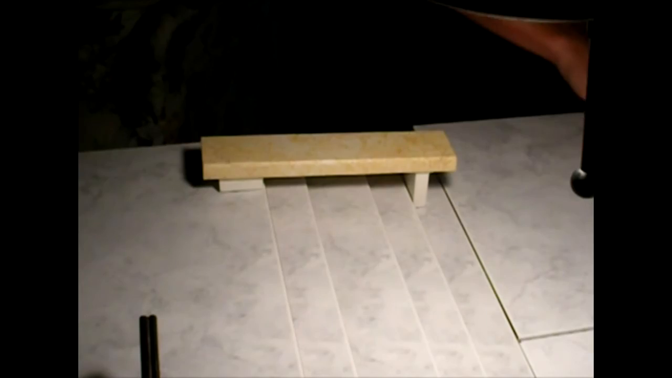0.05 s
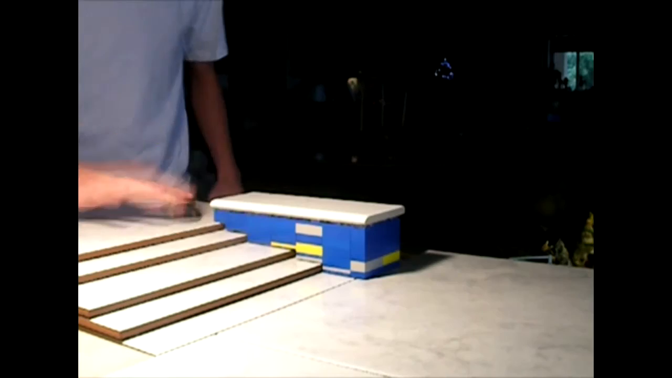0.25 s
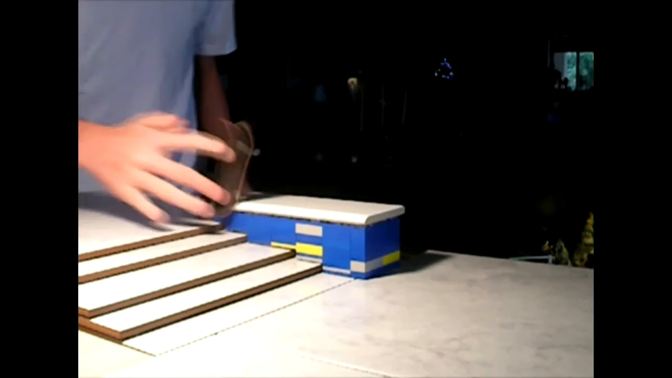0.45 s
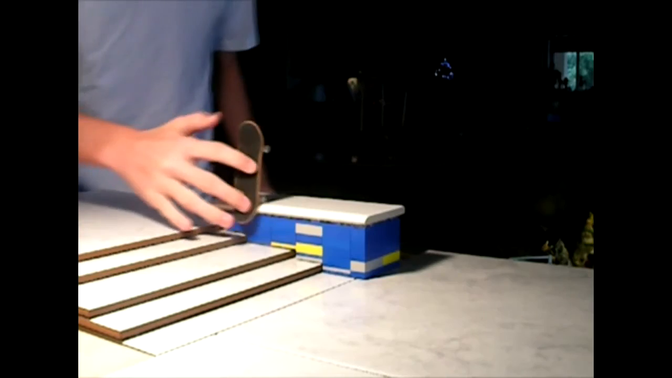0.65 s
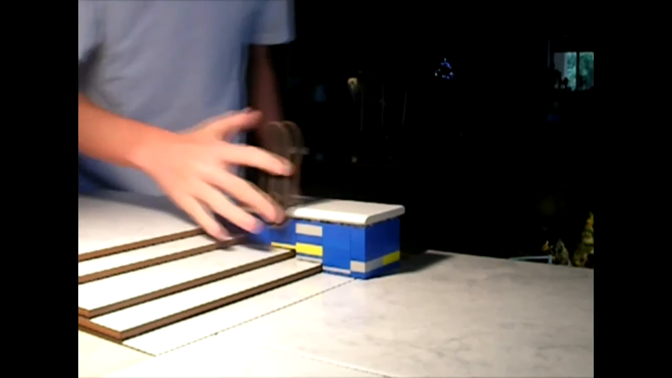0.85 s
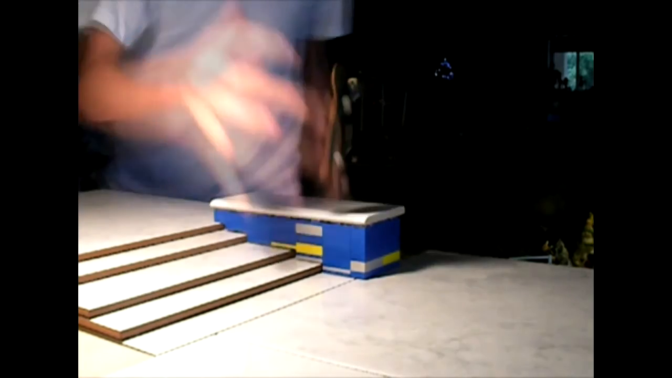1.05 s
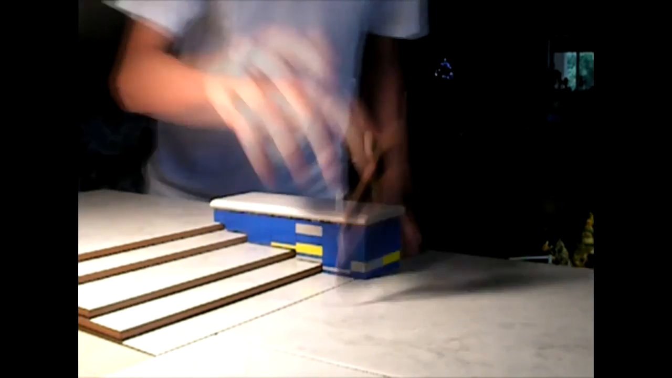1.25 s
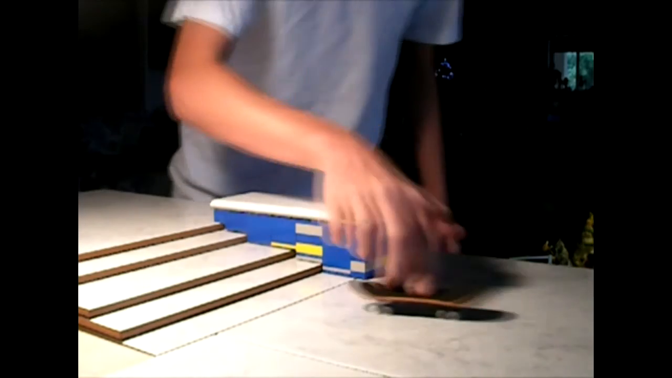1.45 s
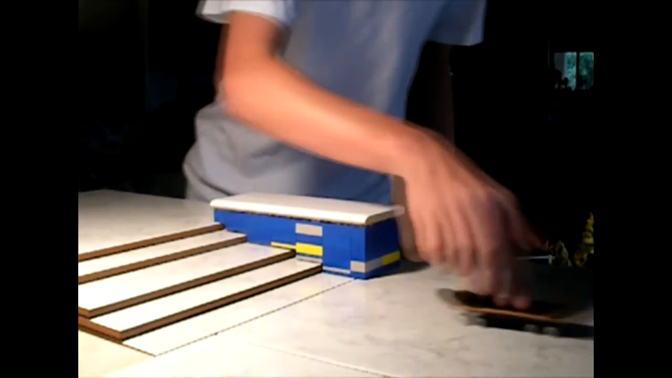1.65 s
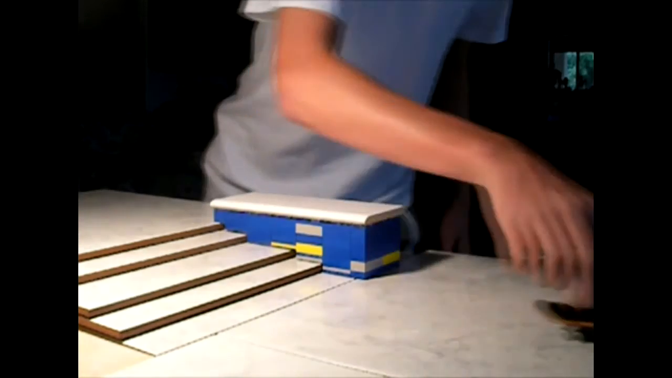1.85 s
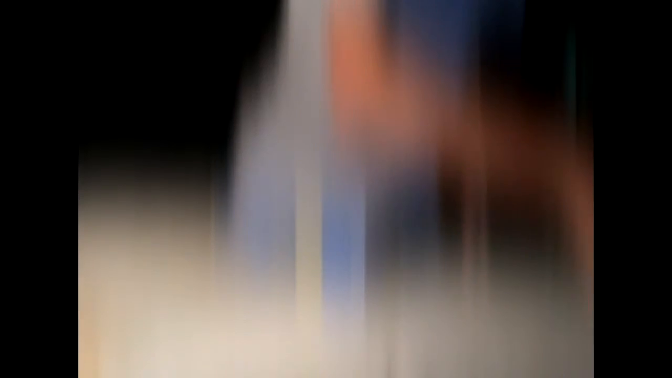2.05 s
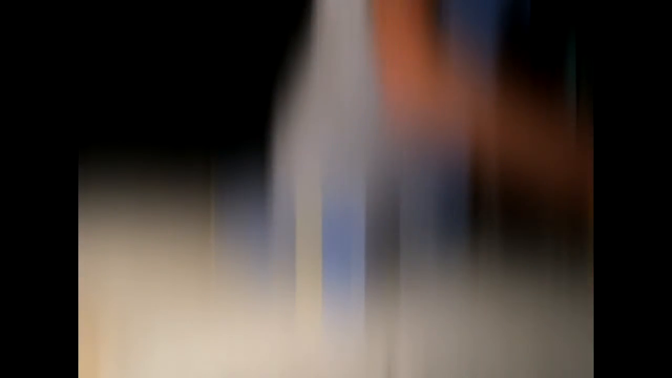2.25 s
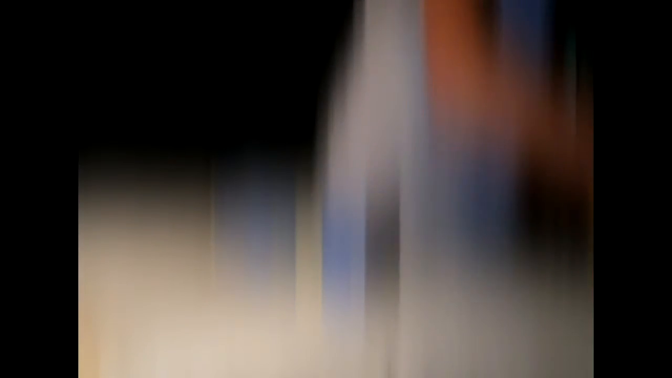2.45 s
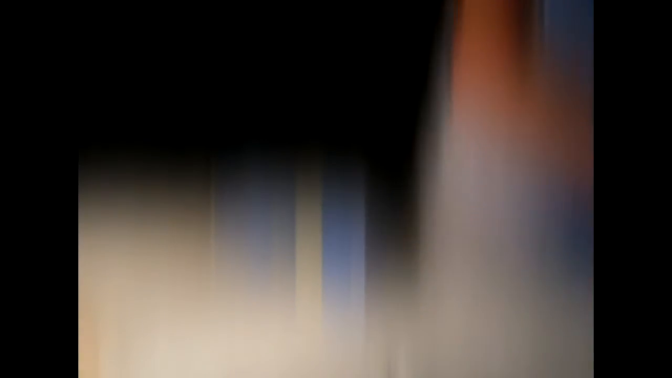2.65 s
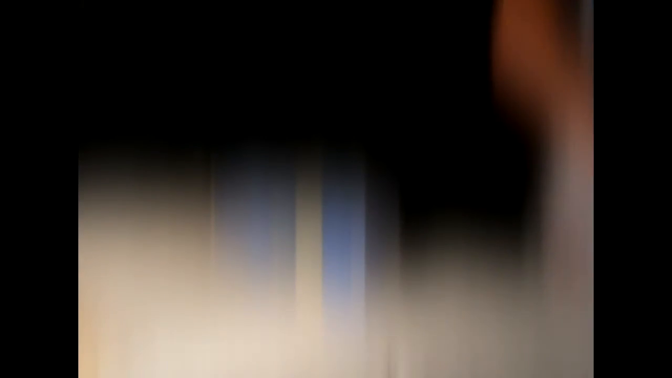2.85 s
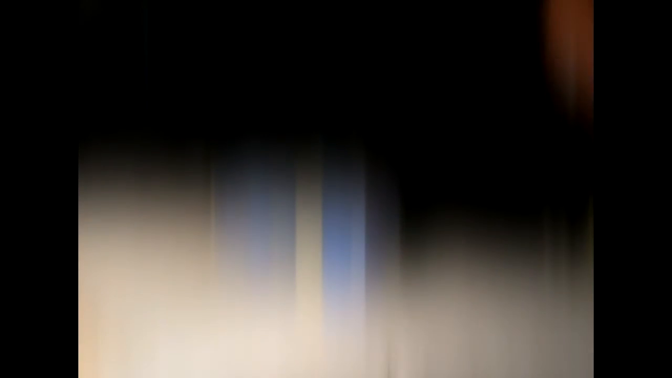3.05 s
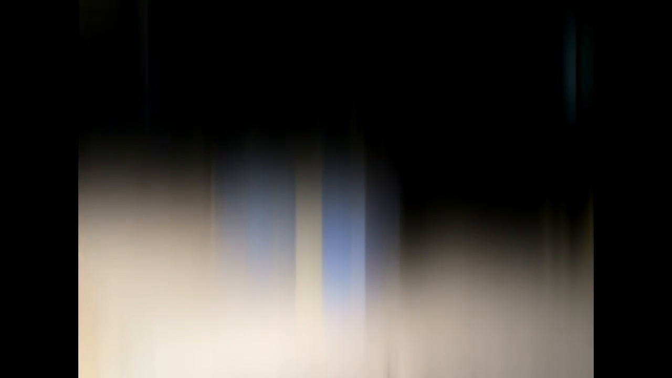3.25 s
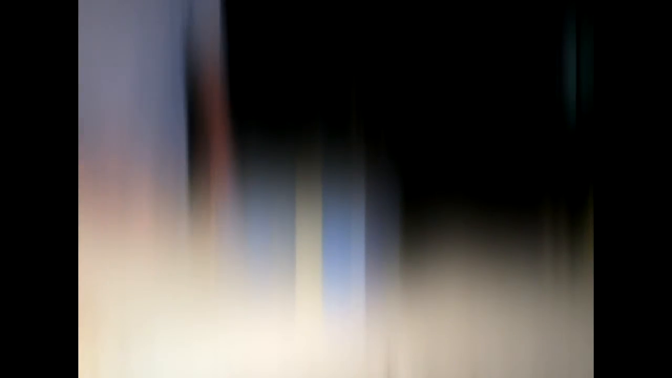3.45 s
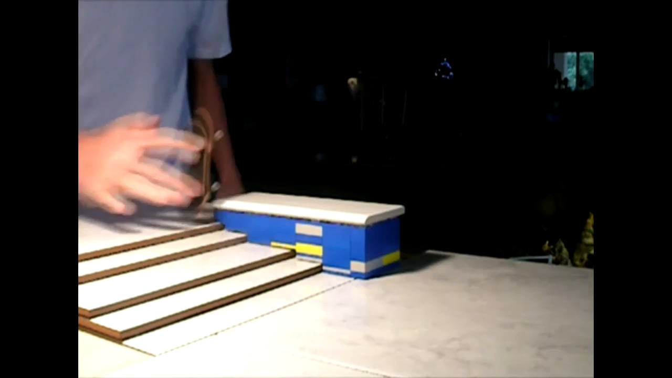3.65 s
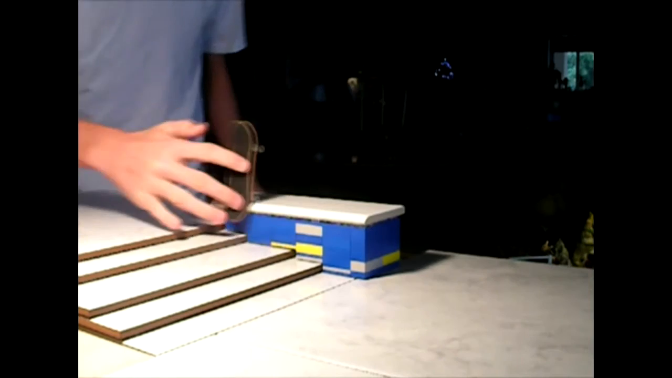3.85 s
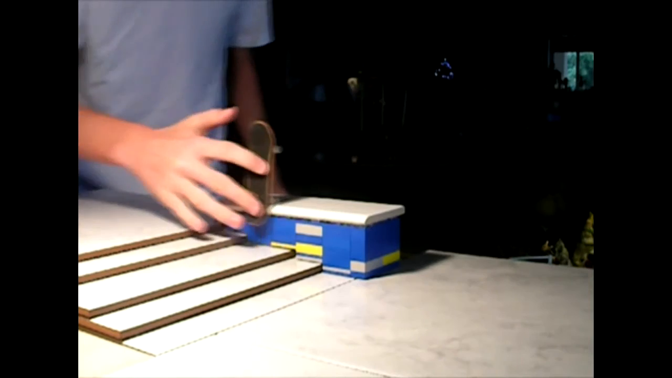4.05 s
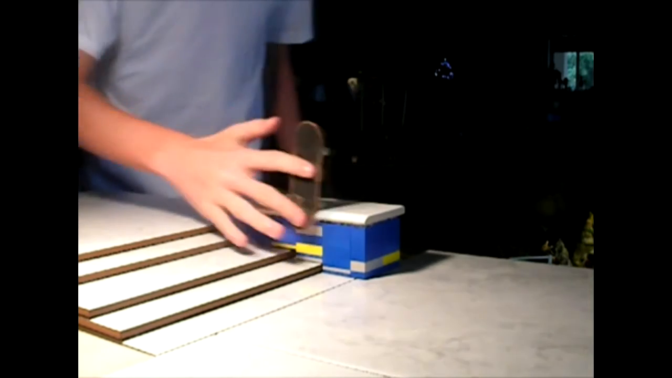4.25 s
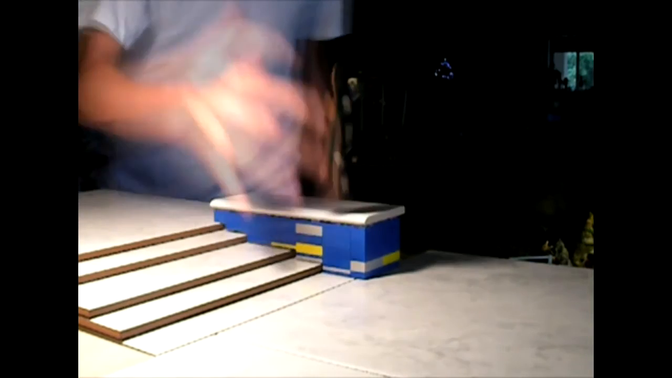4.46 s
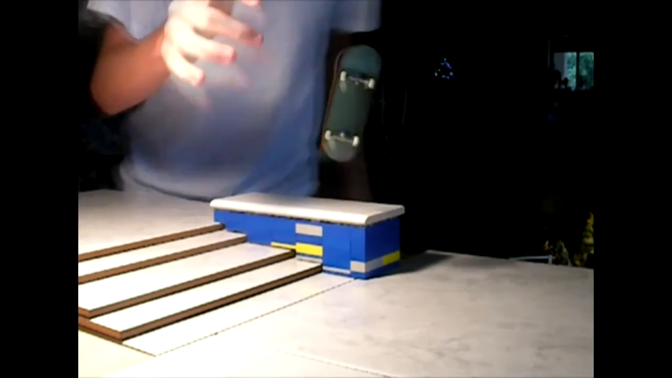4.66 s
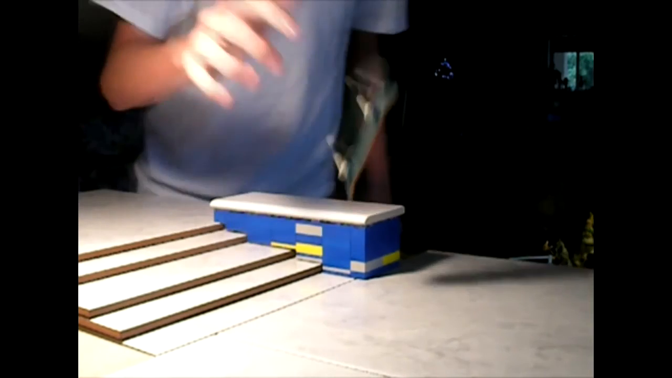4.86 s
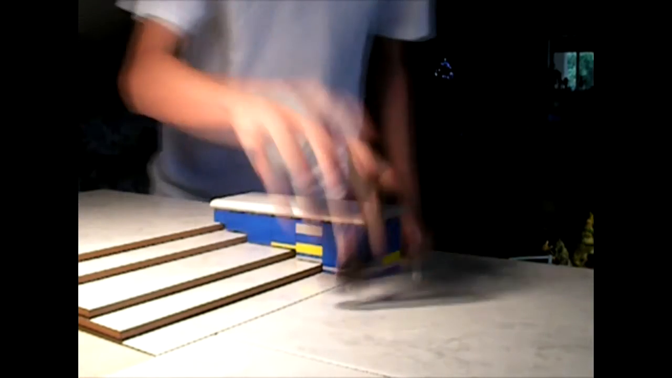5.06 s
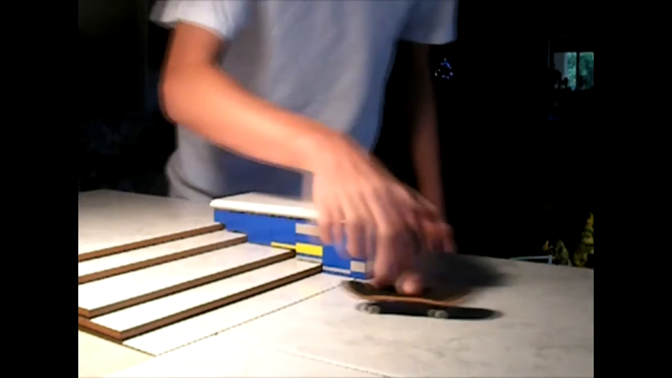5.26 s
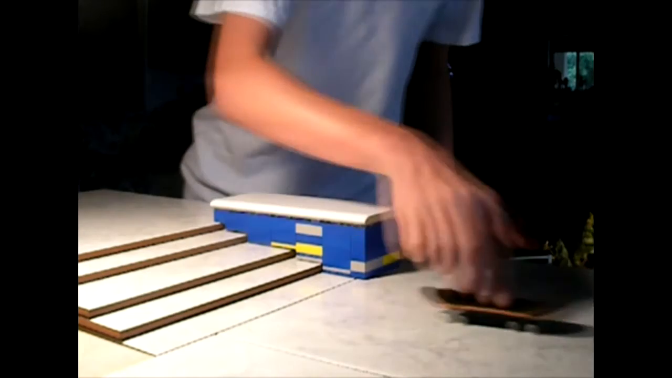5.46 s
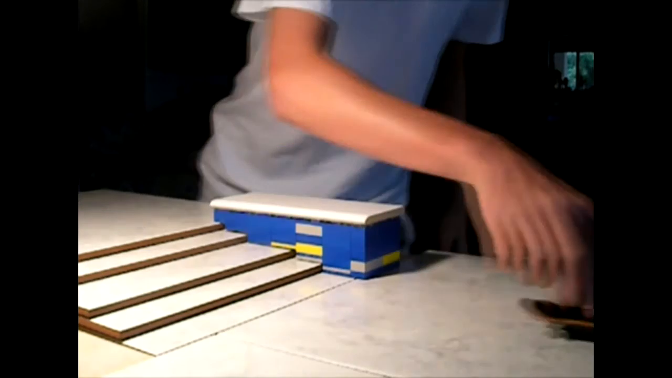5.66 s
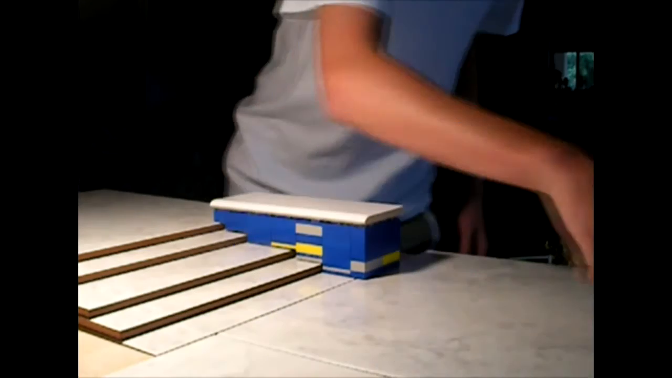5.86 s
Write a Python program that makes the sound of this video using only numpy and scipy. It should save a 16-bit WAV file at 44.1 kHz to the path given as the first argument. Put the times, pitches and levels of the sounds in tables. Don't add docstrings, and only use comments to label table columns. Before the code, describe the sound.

Lo-fi close clacks and gritty small-wheel rolling on a hard tabletop, a sharp landing, loud far knocks, then the trick again, stretched and quieter.

```python
import sys
import numpy as np
from scipy import signal
from scipy.fft import rfft, irfft
from scipy.io import wavfile
from scipy.ndimage import uniform_filter1d

SR = 44100
rng = np.random.default_rng(int(sys.argv[2]) if len(sys.argv) > 2 else 0)


def linear_from_db(decibels):
    return 10 ** (np.asarray(decibels, float) / 20)


def master(y):
    cut = np.clip(np.atleast_2d(y).T, -1, 1)
    pcm = np.round(cut * 32767)
    wavfile.write(sys.argv[1], SR, pcm.astype(np.int16))


N = 260410
T = np.arange(N) / SR

# [t/s, level/dB, skid level of the treble/dB]
RUN_UP_ROLL = [
    [(0, -41, -6), (.022, -34, -13), (.06, -36, -10), (.1, -34.5, -15)],
    [(0.118, -46, -8), (0.146, -39, -7), (0.28, -44, -4), (0.288, -40, -12), (0.324, -51, -5),
     (0.412, -37, -5), (0.43, -40, -4)],
    [(0.475, -45, 2), (0.501, -50, 3), (0.575, -50, -7)],
    [(0.72, -50, -6), (0.878, -55, -8), (0.9, -62, 2)],
    [(3.35, -50, -11), (3.356, -46, -9), (3.43, -44, -9)],
]
# [t/s, level/dB, skid level of the treble/dB]
TILE_ROLL = [
    [(1.53, -33, 2), (1.674, -40, -3), (1.728, -31, -12), (1.884, -37, -9.5), (1.91, -30.5, -20),
     (1.928, -55, -0.5), (1.94, -37, -14), (2.182, -35, -21.5), (2.2, -42.5, -22)],
    [(2.25, -44.5, 14), (2.254, -33, 6.5), (2.396, -32.5, -10), (2.425, -32.5, -27.5)],
    [(2.485, -30, -6), (2.505, -30, -14), (2.519, -30.5, -2.5), (2.579, -30, -10.5), (2.695, -46.5, -11),
     (2.8, -54.5, -10)],
    [(2.885, -53.5, -2.5), (3.025, -42.5, -18.5), (3.043, -37.5, -18), (3.08, -45, -22.5)],
]
# [f/Hz, width/Hz, level/dB]
RUN_UP_BODY = [(177.5, 14, -9.5), (340.6, 48, 8), (473, 98, 12), (810, 98, -2), (1006, 81, 0),
               (990, 210, -7), (1342, 130, 2), (1626, 49, -2.5), (2044, 390, -5.5), (2454, 560, 6.5),
               (3225, 780, 6), (3670, 170, -2)]
TILE_BODY = [(115, 64, -4.5), (150.6, 40, -9), (224.6, 56, -7.5), (300, 70, 0), (372.6, 72, -1),
             (513, 45, -1), (740.3, 98, -14.5), (863, 95, 3), (1025, 54, -4.5), (1080, 48, -9),
             (1593, 200, -1), (1856, 600, 1), (2320, 450, -2.5), (2897, 600, 2), (3620, 830, 0.5)]
# [level at cruise/dB, rise per dB below cruise/1, share of the skid level/1]
RUN_UP_LAW = [(-6, 0.34, 0.03), (-0.5, 0.26, 0.21)]
TILE_LAW = [(-0.5, .3, 0.22), (-4.5, 0.1, 0.55)]
BAND_EDGES_HZ = [650, 1300, 2200]
# [f/Hz, level/dB]
AIR_SPECTRUM = [(88, -39.5), (150, -6), (226, -1.5), (270, -6.5), (313, -1), (611, -7), (672, -2.5),
                (781, -7.5), (2030, -15.5), (3900, -27), (5070, -108), (8580, -120)]
# [t/s, peak level near 1 kHz/dB, weight of the low modes/dB, hardness of the high modes/dB]
LEDGE_KNOCKS = [(.4034, -28, -9, -3), (.4408, -25, 5, 16), (.4517, -27, 6, 6), (.466, -35, 5, 8),
                (.5901, -18, -6, 1), (.6012, -24, -3, 2), (.6072, -21, 8, -4), (.6149, -24, -2, 8),
                (.6257, -20, 2, 2), (.6357, -24, -1, 3), (.6437, -38, 13, 16), (.6773, -25, 1, -1),
                (.6829, -22, 0, -3), (.6957, -34, 8, -2), (.7093, -33, 11, -3)]
FLICK_KNOCKS = [
    (1.1067, -46, -1, 2),
    (1.159, -41, -13, -2),
    (1.1648, -45, 4, 3),
    (1.1702, -38, -4, 0),
]
LANDING_KNOCKS = [(1.4388, -11, -11, 7), (1.4410, -10, -10, 6), (1.4449, -24, 3, 4), (1.4504, -23, -6, 7),
                  (1.4727, -30, -10, 3), (1.4784, -18, 4, 9), (1.4868, -18, -4, 2), (1.4946, -18, -4, 5),
                  (1.506, -25, 2, 13), (1.5099, -18, -4, 3), (1.522, -24, -4, 7), (1.7308, -23, -15, -20)]
FAR_KNOCKS = [(2.2163, -13, -3, 4), (2.2248, -14, -3, 2), (2.2369, -19, -5, -2), (2.4359, -28, -15, 5),
              (2.4392, -9, -8, -4), (2.4504, -3.5, -7, -3), (2.4625, -16, -3, -4), (2.8531, -16, -4, -7),
              (3.0424, -26, -14, -22), (3.0624, -32, 1, -15), (3.0953, -24, -2, 0)]
# [f/Hz, level/dB, decay time t60/s]
LEDGE_MODES = [(143.5, -8, .1), (321.3, 0.5, 0.072), (397, -0.5, .08), (479.3, -2.5, .06),
               (558.3, -4, 0.04), (715, -3, 0.027), (923, 5, 0.019), (1074, -12, 0.011),
               (1420, -2.5, 0.027), (1723, -9, 0.031), (1910, -2, 0.03), (2204, -5, 0.015),
               (2590, 5.5, 0.0081), (3000, -4.5, 0.029), (3230, 2, 0.0074), (3640, -0.5, .01),
               (3610, -5.5, 0.02)]
LANDING_MODES = [(324, 4, 0.042), (426, -5.5, 0.12), (483, 1.5, .045), (548, 3, 0.07), (753, -13.5, 0.017),
                 (867, -2.5, 0.027), (1043, -5.5, 0.033), (1160, -11, 0.019), (1602, -5, 0.048),
                 (1920, -2, 0.0062), (2058, 1.5, 0.026), (2300, -5, 0.016), (2850, -4.5, 0.0063),
                 (2950, -5, 0.016), (3414, -4.5, 0.017), (3763, 8.5, 0.0049)]
FAR_MODES = [(340.5, -1, 0.044), (459.4, -5, 0.058), (555.6, -10, 0.06), (766, -3, 0.025),
             (861, -3.5, .055), (985, -4, 0.033), (1238, -9.5, 0.047), (1425, -3.5, 0.022),
             (1585, -4.5, .03), (1940, 4, 0.0097), (2500, -5, 0.039), (2650, 5, 0.0037), (2810, -3, 0.039),
             (3380, -1, 0.011), (3770, 4, .008)]
# [f/Hz, level/dB]
PLAYBACK = [(0, 0), (2500, -1), (3500, -3.5), (4500, -13), (5500, -28.5), (6300, -42), (7100, -57.5),
            (8000, -52.5), (8900, -66.5), (10500, -58.5), (12000, -62.5), (13200, -85), (15500, -79.5),
            (17000, -96), (22050, -95)]
# [t/s where a piece starts, lag behind the first pass/s]
REPLAY = [(3.415, 3.3034), (4.346, 3.3367), (4.43, 3.374), (4.472, 3.4034), (4.565, 3.4482),
          (4.647, 3.5036), (4.735, 3.5517), (4.80, 3.6029), (4.847, 3.6371), (4.925, 3.6781),
          (5.014, 3.7372), (5.093, 3.7704), (5.146, 3.8039), (5.225, 3.8278), (5.247, 3.8372)]
# [t/s, fade-out/s, fade-in/s]
CUTS = [(0.11, 0.019, 0.0047), (1.977, 0.0031, 0.0076), (3.344, 0.0023, 0.0034), (3.546, 0.0077, 0.0068),
        (4.248, 0.0096, 0.0054), (4.349, 0.0072, 0.0075), (4.644, 0.011, 0.023), (4.847, 0.019, 0.015),
        (5.012, 0.013, .014), (5.147, 0.0098, 0.0075), (5.246, 0.01, 0.0076)]

# (level/dB, share of the hardness/1)
LEDGE_MID, FLICK_MID, LANDING_MID, FAR_MID = (-0.5, 0.51), (6.5, .3), (-3, 0.48), (-1, 1.6)


def unit(x):
    return x / np.sqrt(np.mean(x ** 2))


def resonance(x, hz, width):
    return signal.lfilter(*signal.iirpeak(hz, hz / width, SR), x)


def spectral_gain(length, points, log):
    hz, db = np.transpose(points)
    f = np.arange(length // 2 + 1) * SR / length
    if log:
        return linear_from_db(np.interp(np.log(f + 1), np.log(hz), db))
    return linear_from_db(np.interp(f, hz, db))


def band_of(hz):
    return [1, 0, 2, 3][np.searchsorted(BAND_EDGES_HZ, hz)]


def wheels(spans, body, law, lumps_db=2.3, lumps_per_s=60):
    cruise_db = -38.5
    burst_db = 1.5 * rng.exponential(size=(4, N))
    grit = rng.standard_normal((4, N)) * linear_from_db(burst_db)
    bands = np.zeros((4, N))
    for hz, width, db in body:
        band = band_of(hz)
        once = resonance(grit[band], hz, 1.6 * width)
        bands[band] += linear_from_db(db) * unit(resonance(once, hz, 1.6 * width))
    k = int(SR / lumps_per_s)
    bumps = np.repeat(rng.standard_normal((4, N // k + 1)), k, axis=1)
    lumps = uniform_filter1d(bumps, k // 2, axis=1)[:, :N]
    depth_db = lumps_db * np.array([[1], [.9], [.7], [.4]])
    bands *= linear_from_db(depth_db * (lumps + lumps[0]) / 2)
    out = np.zeros(N)
    for span in spans:
        s, db, skid_db = np.transpose(span)
        fade_in = (T - s[0]) / .008 + 2
        fade_out = (s[-1] - T) / .002 + 7
        inside = np.clip(np.minimum(fade_in, fade_out), 0, 1)
        extras = [0 * db]
        for rest_db, rise, share in law:
            extras.append(rest_db + rise * (cruise_db - db) + share * skid_db)
        extras.append(skid_db)
        for band, extra in zip(bands, extras):
            out += inside * linear_from_db(np.interp(T, s, db + extra)) * unit(band)
    return out


def air():
    noise = rng.standard_normal(N)
    hiss = irfft(rfft(noise) * spectral_gain(N, AIR_SPECTRUM, True), N)
    return linear_from_db(-49) * unit(hiss)


def knocks(table, modes, mid, contact_s=.0005, scatter_db=1.0, detune=.01, chatter_s=.008):
    chatter_again, chatter_clean, settle_s = .3, .1, .03
    crack = 1.5
    size = 8192
    out, t, last = np.zeros(N + size), np.arange(size) / SR, -1
    t_contact = t[:2048]
    for s, peak_db, weight_db, hard_db in table:
        chatter = chatter_again if s - last < settle_s else chatter_clean
        last = s
        chance = rng.standard_normal((2, len(modes)))
        rough = rng.standard_normal((2, 2048))
        contact = rough[0] * t_contact / contact_s * np.exp(1 - t_contact / contact_s)
        contact += chatter * rough[1] * np.exp(-t_contact / chatter_s)
        contact[round(contact_s * SR)] += crack * 4
        bands = np.zeros((4, size))
        for (hz, db, t60), a, b in zip(modes, *chance):
            t60 = min(t60, 45 / hz)
            decay = np.exp(-np.log(1000) * t / t60)
            ring = decay * np.sin(2 * np.pi * hz * (1 + detune * b) * t)
            bands[band_of(hz)] += linear_from_db(db + scatter_db * a) * np.sign(b) * ring
        bands = signal.fftconvolve(bands, contact[None])[:, :size]
        band_db = np.array([0, weight_db, mid[0] + mid[1] * hard_db, hard_db])
        gains = linear_from_db(peak_db + band_db) / np.abs(bands).max(axis=1)
        start = int(s * SR)
        out[start:start + size] += gains @ bands
    return out[:N]


def room(x):
    t60_s, level_db = 0.2, -11.5
    t = T[:SR // 2]
    tail = rng.standard_normal(len(t)) * np.exp(-np.log(1000) * t / t60_s) * (t > .004)
    tail = tail / np.sqrt(np.sum(tail ** 2))
    return linear_from_db(level_db) * signal.fftconvolve(x, tail)[:N]


def scene():
    board = wheels(RUN_UP_ROLL, RUN_UP_BODY, RUN_UP_LAW)
    board = board + knocks(LEDGE_KNOCKS, LEDGE_MODES, LEDGE_MID)
    board = board + knocks(FLICK_KNOCKS, LEDGE_MODES, FLICK_MID)
    board = board + knocks(LANDING_KNOCKS, LANDING_MODES, LANDING_MID)
    board = board + wheels(TILE_ROLL, TILE_BODY, TILE_LAW)
    board = board + knocks(FAR_KNOCKS, FAR_MODES, FAR_MID)
    return np.tile(board + room(board) + air(), (2, 1))


def camera(x):
    blocks = N // 441 + 1
    long, short = 441 * blocks, 80 * blocks
    f = np.arange(short // 2 + 1) * SR / long
    guard = np.clip((4000 - f) / 100, .75, 1)
    samples = irfft(rfft(x, long)[:len(f)] * guard, short) * short / long
    steps = (np.floor(np.clip(samples, -1, 1) * 128 - .22) + .22) / 128
    images = np.fft.fft(steps)[np.arange(long // 2 + 1) % short]
    images[short::short] = 0
    return irfft(images * spectral_gain(long, PLAYBACK, False), long)[:N] * long / short


def overload(x):
    return x + np.diff(.07 * x ** 2, prepend=0) - .02 * x ** 3


def editor(x):
    slowed_s, slowed_db = 4.246, -3.35
    splice_s, splice_db = 4.4797, -57
    out = x
    for s, lag in REPLAY:
        share = np.clip((T - s) / 0.009 + .5, 0, 1)
        out = (1 - share) * out + share * np.roll(x, round(lag * SR))
    out = out * np.where(T > slowed_s, linear_from_db(slowed_db), 1)
    impulse = 1. * (np.arange(N + 1) == round(splice_s * SR))
    out = out + linear_from_db(splice_db) * np.diff(impulse)
    for s, fall, rise in CUTS:
        out = out * np.clip(np.maximum((s - T) / fall, (T - s) / rise), 0, 1)
    return out


def low_pass(x):
    return signal.sosfilt(signal.butter(12, 15800, fs=SR, output="sos"), x)


def record(dry):
    high_pass = signal.butter(3, 168.2, "high", fs=SR, output="sos")
    mic = signal.sosfilt(high_pass, dry[0])
    played = overload(camera(mic))
    mix = np.tile(editor(played), (2, 1))
    return low_pass(mix)


dry = scene()
out = record(dry)
master(out)
```